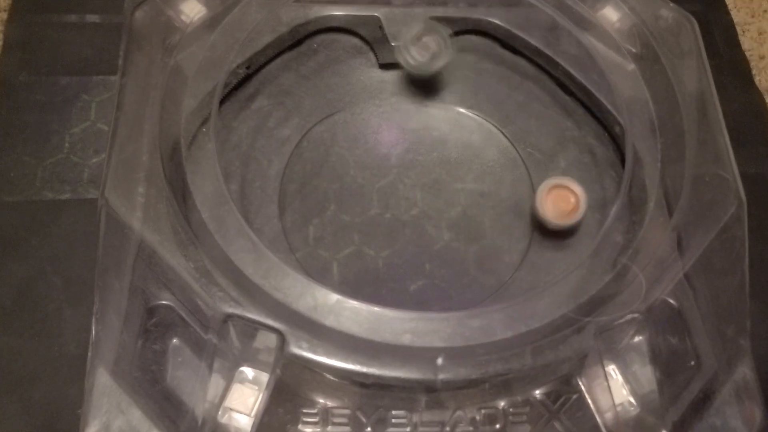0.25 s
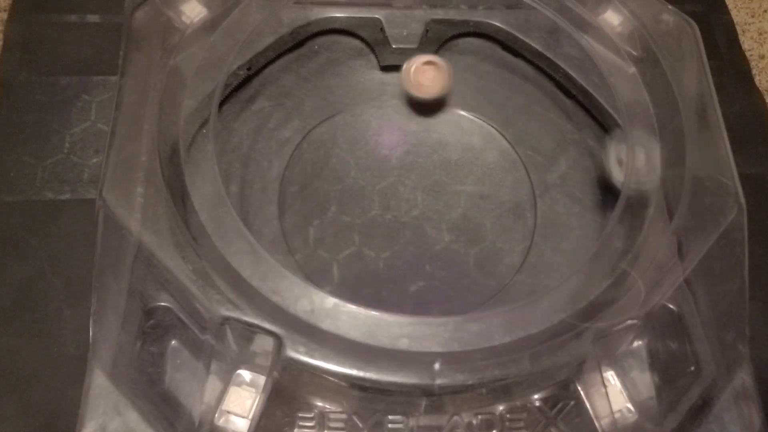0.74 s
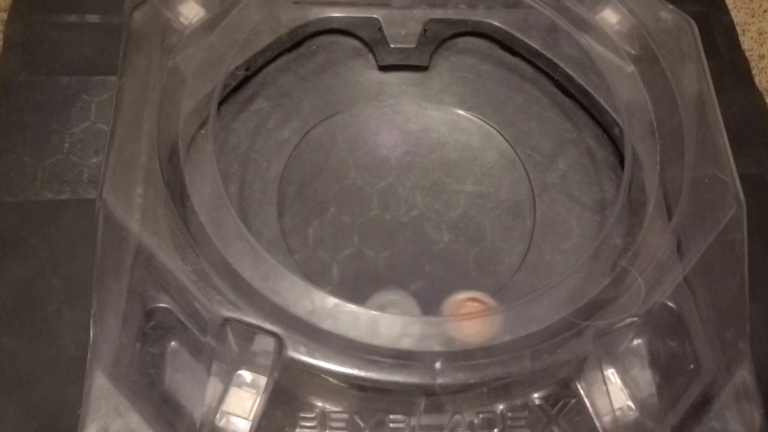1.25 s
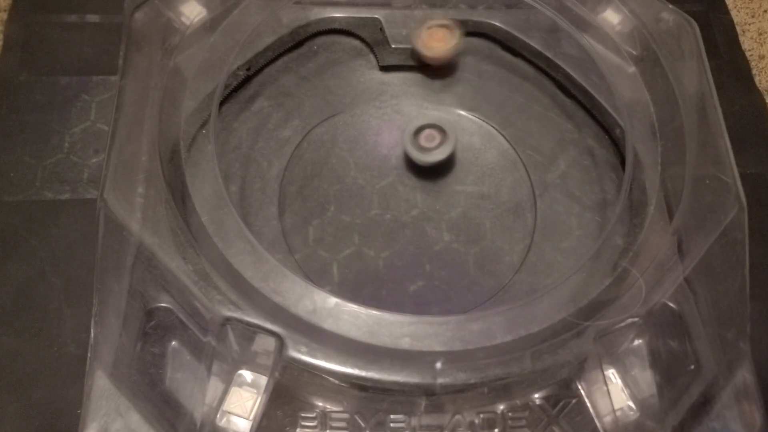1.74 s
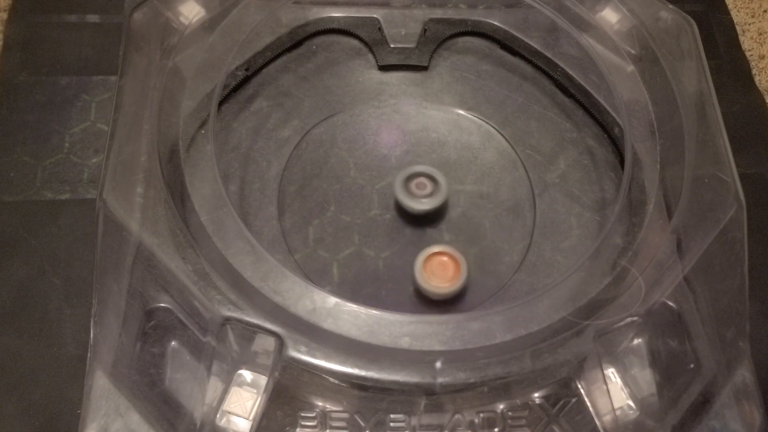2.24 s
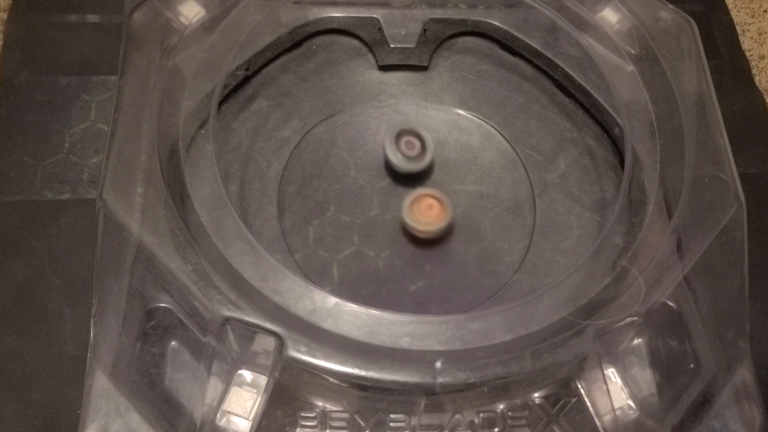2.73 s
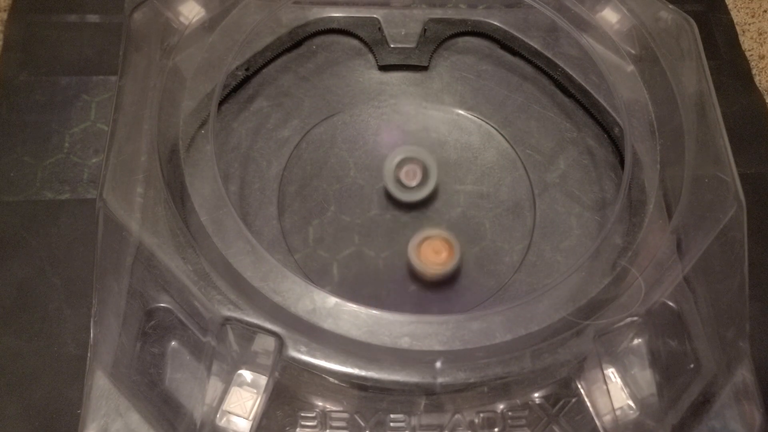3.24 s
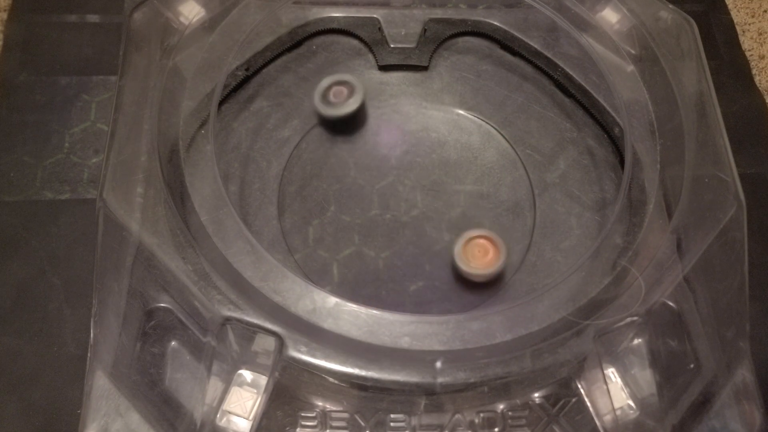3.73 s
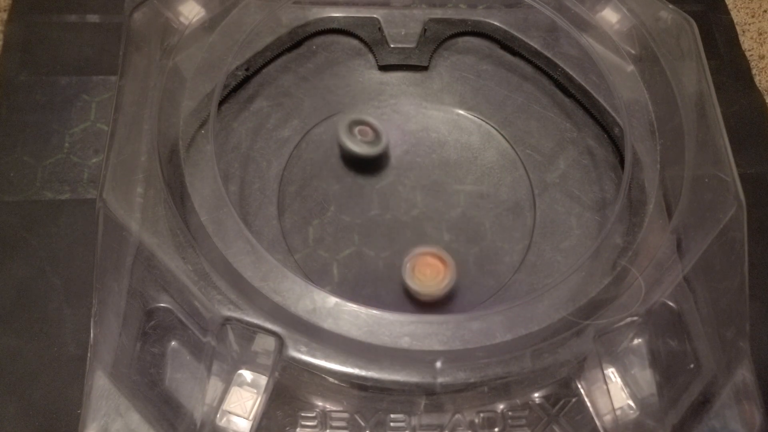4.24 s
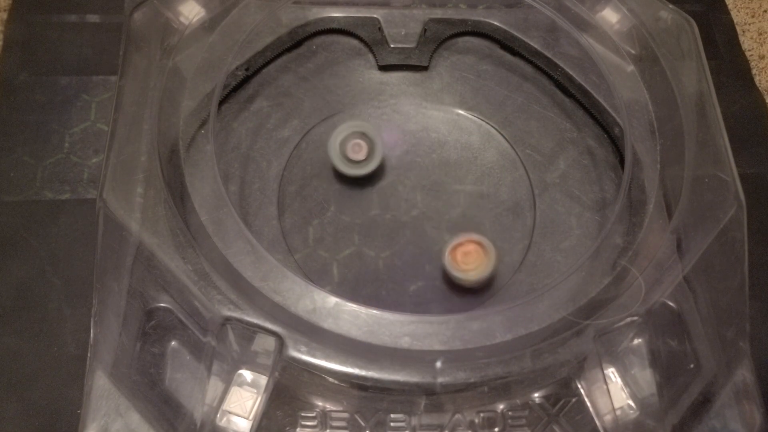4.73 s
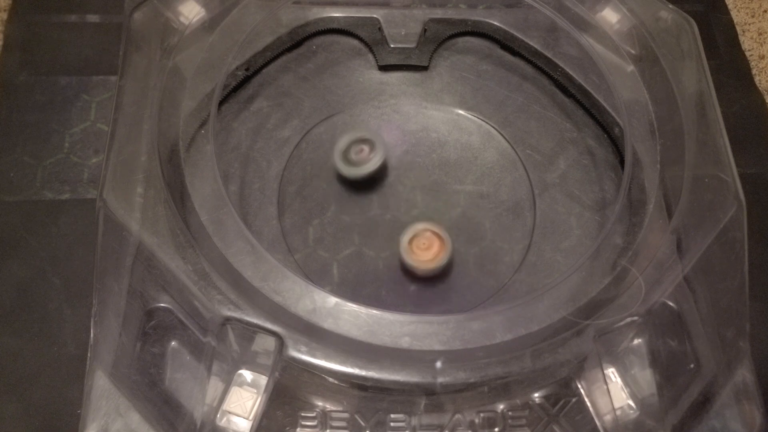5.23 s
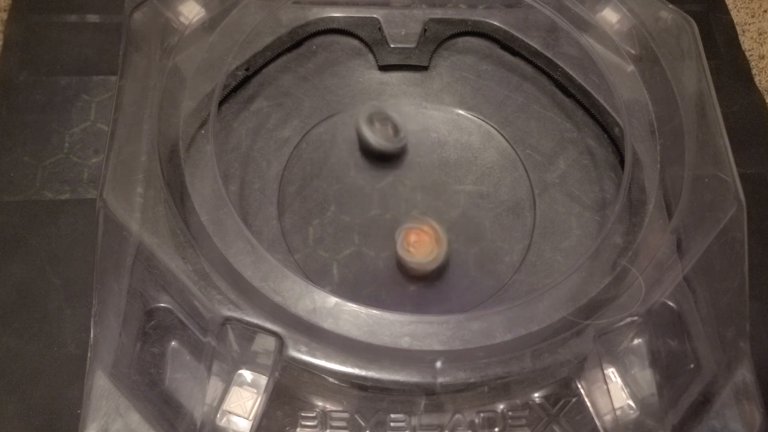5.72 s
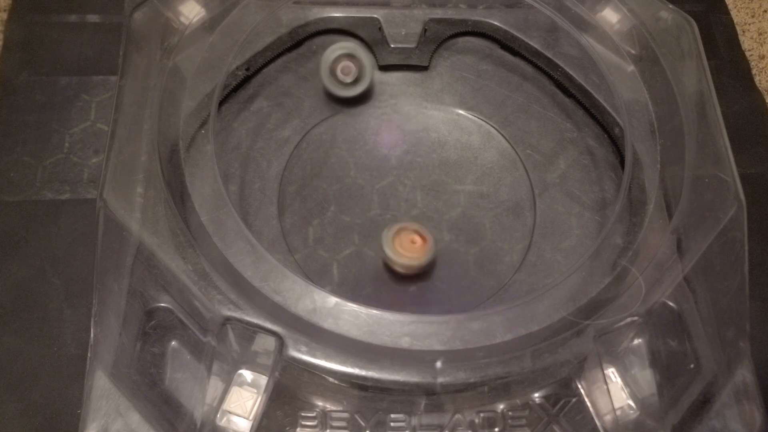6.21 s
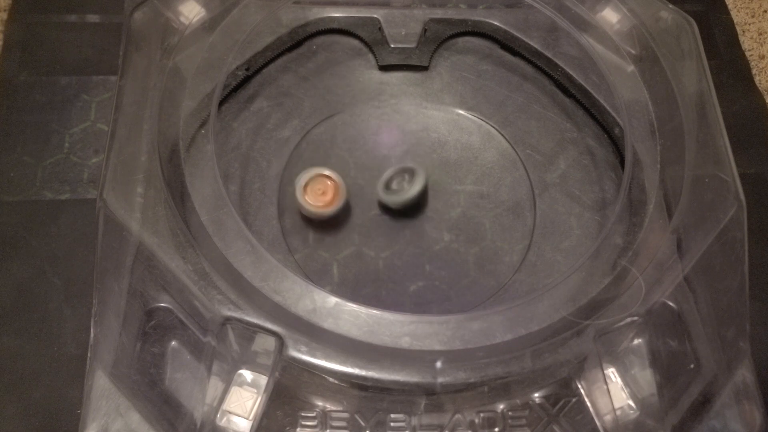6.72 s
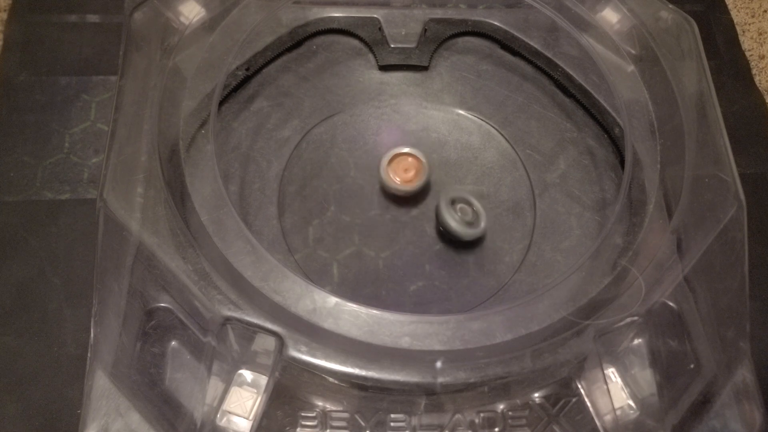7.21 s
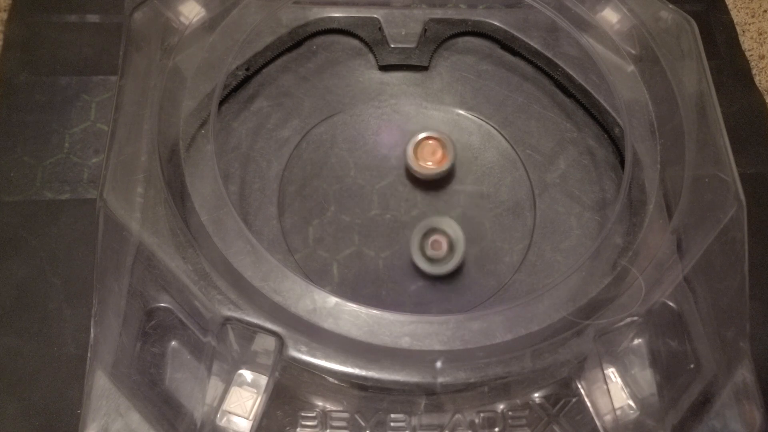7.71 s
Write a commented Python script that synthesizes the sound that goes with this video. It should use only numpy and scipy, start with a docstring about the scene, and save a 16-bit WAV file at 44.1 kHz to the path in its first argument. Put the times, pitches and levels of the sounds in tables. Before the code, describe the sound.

Close up, toy tops buzz along a toothed plastic rim, knock the walls, then circle and strike each other with bright metal clacks.

```python
"""Two spinning toy tops battle in a thin plastic bowl, close to a phone in a small room.
At first their tips scrape the floor while they race along the toothed rim rail and knock the wall.
Then they circle in the middle and their metal rings clash: noise bursts set decaying tones ringing.
After each clash a top drops back on the drum-like floor, a soft push on ringing tones.
Between clashes the wobbling tips throb, tick and hiss once a turn, as pushes and filtered noise."""
import sys
import numpy as np
from scipy import signal
from scipy.fft import rfft, irfft
from scipy.io import wavfile
from scipy.ndimage import uniform_filter1d

SR = 44100
rng = np.random.default_rng(int(sys.argv[2]) if len(sys.argv) > 2 else 0)


def digitize_waveform(pressure):
    """Quantize a signal to 16-bit integers and store it at the path in sys.argv[1].

    Rows of a 2-D input are taken as channels; values are limited to [-1, 1].
    """
    field = np.atleast_2d(pressure).T
    bounded = np.clip(field, -1, 1)
    quanta = np.round(bounded * 32767).astype(np.int16)
    wavfile.write(sys.argv[1], SR, quanta)


N = 351036
AGE = np.arange(SR // 4) / SR  # time since a blow, in seconds

# Levels in the tables are set against each other; each source is trimmed as a whole when mixed.
# Each new wobble of the tops: they climb the bowl to a turning point, then slide back;
# the scrape swells or fades on each leg:
# start t/s, floor panel f/Hz, unevenness/dB, second scrape half a turn later/0-1, edge click over scrape/dB,
# climb/s, scrape on leaving/dB, at the turning point/dB, on return/dB, throb over scrape/dB, roll over scrape/dB
WOBBLES = [(0.0, 193, 4, 0, -13, 0.27, -36, -48.5, -43, 0, -0.5),
           (0.96, 139.5, 6, 0.85, -9, 0.52, -45, -46, -60.5, 8.5, 2.5),
           (1.98, 113, 4.5, 0.3, -22, 0.14, -50.5, -52, -54, 7.5, 1.5),
           (2.46, 170.5, 4, 1, -21, 0.11, -46.5, -54, -45.5, 8.5, 0.5),
           (2.815, 172, 3, 0, -20, 0.12, -49, -51.5, -37.5, 3.5, -2.5),
           (3.33, 171, 7, 0, -18, 0.1, -41, -41.5, -42, 2, -9),
           (3.601, 167, 4, 0, -5, .3, -37, -52, -44, 5.5, 1.5),
           (4.155, 151, 2.5, 0.63, 4, 0.24, -44, -42.5, -40, 6, -3.5),
           (4.622, 130, 6.5, 0.17, 2, 0.19, -33.5, -50.5, -52, 0.5, -4),
           (5.210, 118, 2, .02, 3, .22, -40, -46.5, -41, 3, -3.5),
           (5.88, 225, 2, 0.64, -33, 0.16, -54.5, -43.5, -45, -12, -1),
           (6.540, 176, 4, 0, 4, 0.27, -43, -48, -46, -2, -3),
           (6.884, 126, 0.7, 0, 10.5, 0.31, -39.5, -51.5, -45.5, 1.5, -3.5),
           (7.639, 179, 2, 0.05, 6.5, 0.054, -50, -41.5, -44.5, 0, -1.5)]
# the leaning top slows down: t/s, spin/turns per s
SPIN_SPEED = [(.5, 54.6), (2.22, 50.6), (2.64, 48.1), (3.07, 47.3), (3.88, 44.1), (4.39, 41.6),
              (4.92, 39.4), (5.55, 37.8), (6.21, 32.8), (7.26, 30.5), (7.8, 29.3)]
# a top hits the plastic wall: t/s, level/dB, treble/dB, pitch of the wall there f/Hz, jolt of the floor/dB
WALL_KNOCKS = [(0.002, -13.5, -8, 726, -18.5), (0.064, -17, -14, 720, -21), (0.497, -10, -8, 800, -20),
               (0.53, -14, -5, 600, -21), (0.665, -11, -6.5, 670, -15.5), (0.76, -10.5, -3.5, 720, -36),
               (0.802, -13.5, -11.5, 563, -20), (0.919, -9.5, -0.5, 714, -28),
               (1.117, -14, -11.5, 2050, -13), (1.1735, -4.5, -15, 824, -37), (1.178, -10.5, -13, 366, -26),
               (1.35, -17, -6.5, 680, -26), (1.573, -21, -7.5, 654, -25.5),
               (1.7474, -13.5, -5.5, 630, -28.5), (4.3296, -23, -14.5, 2520, -39),
               (4.692, -18.5, -4.5, 1060, -16.5), (5.684, -32, 8, 3500, -31), (5.858, -9, -16, 574, -28),
               (6.526, -18, -12, 700, -24), (6.625, -26, -6, 1070, -29), (6.956, -32.5, -9, 580, -27)]
# metal ring hits metal ring, then the drop back: t/s, level/dB, top octave/dB, left minus right/dB,
# strongest ring f/Hz, plastic body/dB, hop/s, landing/dB, panel landed on f/Hz
RING_CLASHES = [(0.2377, -8, -27, -0.5, 5450, -33, 0.0054, -20, 190),
                (2.4214, -5.5, -12.5, 0, 5700, -49, 0.021, -15.5, 179),
                (2.7984, -5.5, -18, 0.5, 5570, -45, 0.026, -15, 200),
                (3.3114, -7, -13, 0, 3900, -23, 0.011, -5, 198),
                (3.5734, -5, 9, -1, 4800, -17, 0.0092, -64, 119),
                (3.5799, -8, -24, 0.5, 4360, -25, 0.11, -18, 208),
                (4.1456, -8, -6, -1, 2700, -38, 0.00095, -16.5, 185),
                (4.6101, -5.5, -9, 0.5, 4200, -19, 0.0052, -9.5, 176),
                (5.1858, -11.5, -28, -0.5, 5800, -39, 0.043, -18, 118),
                (5.7104, -6, -14, -0.5, 4800, -26, .024, -11, 190),
                (5.857, -9.5, -26, 1.5, 3647, -39, 0.0055, -8, 317),
                (6.5267, -12.5, -26, -2.5, 4100, -42, 0.0025, -7.5, 295),
                (6.8517, -5, -12, 2.5, 4340, -29, .012, -5, 192),
                (7.633, -6.5, -10, 0, 3500, -32, .004, -51, 173)]


def undb(db):
    """Turn decibels into gain."""
    return 10 ** (np.asarray(db) / 20)


def unit(x):
    """Scale to an average strength (rms) of 1."""
    return x / np.sqrt(np.mean(x ** 2))


def peak(x):
    """Scale so that the loudest 3 ms have rms 1."""
    power = np.mean(np.atleast_2d(x) ** 2, axis=0)
    return x / np.sqrt(uniform_filter1d(power, size=132).max())


def fade(t60):
    """Die away after a blow, by 60 dB in t60 seconds."""
    return np.exp(-np.log(1000) * AGE / t60)


def add(track, s, sound):
    """Mix a sound in at time s."""
    i = max(int(s * SR), 0)
    part = track[..., i:i + sound.shape[-1]]
    part += sound[..., :part.shape[-1]]


def through(x, response):
    """Send a sound through a response (convolve), keeping its length."""
    return signal.fftconvolve(np.atleast_2d(x), np.atleast_2d(response), axes=-1)[:, :x.shape[-1]]


def colour(x, points, size=2048):
    """Filter to a spectrum of (f/Hz, gain/dB) points, with no sound ahead of its cause."""
    hz, db = np.transpose(points)
    bins = np.maximum(np.arange(size // 2 + 1) * SR / size, 1)
    gain = undb(np.interp(np.log(bins), np.log(hz), db))
    # folding the cepstrum forward makes the filter minimum-phase
    cepstrum = irfft(np.log(gain))
    cepstrum[1:size // 2] *= 2
    cepstrum[size // 2 + 1:] = 0
    return through(x, irfft(np.exp(rfft(cepstrum))))


def resonate(x, hz, width):
    """Let one resonance, width Hz wide, sing along with a sound."""
    return signal.lfilter(*signal.iirpeak(hz, hz / width, fs=SR), x)


def ports(x, pan_db):
    """Place a sound between the microphone ports; the left one hears it 0 to 3 samples earlier."""
    lag = rng.integers(0, 4)
    right = np.pad(x[1], (lag, 0))[:x.shape[1]]
    return np.array([x[0], right]) * undb(np.array([[pan_db], [-pan_db]]) / 2)


def pair(n, apart):
    """Make left and right noises that share a common part."""
    return (rng.standard_normal(n) + apart * rng.standard_normal((2, n))) / np.hypot(1, apart)


def ring(modes, scatter_db, detune):
    """Sound the decaying tones of a struck body; every blow varies their levels and pitches."""
    chance = rng.standard_normal((len(modes), 2))
    total = 0
    for (hz, db, t60), (level_chance, pitch_chance) in zip(modes, chance):
        tone = np.sin(2 * np.pi * hz * (1 + detune * pitch_chance) * AGE)
        total = total + undb(db + scatter_db * level_chance) * fade(t60) * tone
    return total


def thump(hz, t60, push_s):
    """A soft push bends one panel and sets the whole floor ringing; slow bending does not radiate."""
    # tones of the floor: f/Hz, level/dB, 60 dB decay/s
    floor_modes = [(80, -18, 0.15), (104, -24.5, 0.57), (187.6, -8.5, 0.13), (237.6, -33.5, 0.2),
                   (349.7, -19.5, 0.14)]
    panel = fade(t60) * np.sin(2 * np.pi * hz * AGE)
    push = np.sin(np.pi * np.minimum(AGE / push_s, 1)) ** 2
    bend = through(panel + ring(floor_modes, scatter_db=-1, detune=0.017), push)
    return peak(signal.sosfilt(signal.butter(3, 75, "high", fs=SR, output="sos"), bend))


def room_air():
    """The quiet, bass-heavy noise of the room is filtered random noise."""
    # spectrum of the quiet room: f/Hz, gain/dB
    air_colour = [(25, 9), (55, -32), (120, 8.5), (300, -6), (1000, -13), (4000, -30), (16000, -51)]
    return unit(colour(pair(N, apart=0.09), air_colour)) * undb(-51)


def turns(start, end, hz, slowing):
    """Times of the turns of a top that loses a share of its speed every second."""
    age = np.arange(0, end - start, 1 / hz)
    return start + age + slowing * age * (age - (end - start)) / 2


def wobble_ends():
    """Each wobble lasts until the next one starts."""
    return [row[0] for row in WOBBLES[1:]] + [N / SR]


def travel(t):
    """Throb, scrape and roll in dB: they glide to the turning-point level on the climb, then to the return."""
    climb_bend, return_bend = 1.2, 3.2  # powers: the climb steepens, the return levels off
    downhill_db = 2.5  # extra throb of a top that presses into the hollow on its way back
    levels = np.zeros((3, N))
    for row, end in zip(WOBBLES, wobble_ends()):
        start, *_, climb_s, leave_db, turn_db, return_db, throb_db, roll_db = row
        climb = np.clip((t - start) / climb_s, 0, 1) ** climb_bend
        return_s = max(end - start - climb_s, 1 / SR)
        back = 1 - np.clip((end - t) / return_s, 0, 1) ** return_bend
        db = leave_db + (turn_db - leave_db) * climb + (return_db - turn_db) * back
        levels = np.where(t >= start, [db + throb_db + downhill_db * back, db, db + roll_db], levels)
    return uniform_filter1d(levels, size=SR // 50)


def other_top(t):
    """The other top spins faster and runs more smoothly: one equal rub per turn."""
    spin_hz = 1.27 * np.interp(t, *np.transpose(SPIN_SPEED))
    phase = np.cumsum(spin_hz) / SR % 1
    return np.exp(-phase / 0.19)


def rubs(friction, t):
    """A tip rubs one patch of the floor into singing: friction noise through a doubled resonance."""
    # singing patches: t/s, length/s, f/Hz, width/Hz, level/dB
    patches = [(2.988, 0.45, 1415, 200, -51), (2.975, .42, 2240, 1110, -56),
               (3.957, 0.88, 3500, 940, -50.5), (5.887, 0.46, 680, 375, -38.5),
               (5.975, 0.84, 387, 148, -40), (6.0, 0.66, 7905, 3496, -58), (7.318, 0.59, 1080, 79.6, -48)]
    out = np.zeros((2, N))
    for s, length, hz, width, db in patches:
        swell = np.sin(np.pi * np.clip((t - s) / length, 0, 1))
        song = resonate(resonate(friction, hz, width), hz, width)
        out += unit(song) * swell * undb(db - 5.0)
    return out


def tips():
    """Once a turn the leaning top presses the floor and its tip scrapes; similar bumps return each turn."""
    # spectra of scraping, rolling and the click of the tip's edge: f/Hz, gain/dB
    scrape_colour = [(710, -20), (1200, -0.5), (1370, -1.5), (1610, -9.5), (2020, -4.5), (2480, -10),
                     (3510, -3), (5300, -1.5), (5780, -7.5), (6440, -4), (11300, -17), (14800, -15),
                     (16000, -19)]
    roll_colour = [(24, -36), (40, -9), (65, -22.5), (102, -5.5), (157, -2.5), (174, -21), (222, -4),
                   (264, -4.5), (373, -13.5), (545, -21), (732, -19.5), (999, -28.5), (2500, -40),
                   (3250, -74), (5500, -120)]
    edge_colour = [(1500, -55), (3500, 6), (7000, 7), (15000, -3)]
    t = np.arange(N) / SR
    throb_db, scrape_db, roll_db = travel(t)
    throb, ticks, bumps, edge = np.zeros((1, N)), np.zeros(N), np.zeros(N), np.zeros(N)
    for row, end in zip(WOBBLES, wobble_ends()):
        start, panel_hz, uneven_db, second, edge_db, *_ = row
        spin_hz = np.interp((start + end) / 2, *np.transpose(SPIN_SPEED))
        press = thump(panel_hz, t60=0.074, push_s=0.0018)
        press = press / np.sqrt(np.sum(press ** 2) * spin_hz / SR)  # equal power at any spin
        track = rng.standard_normal(int(SR / spin_hz))
        for turn in turns(start, end, spin_hz, slowing=.02):
            force, grit, slip, later = rng.standard_normal(4)
            # the tip wanders on to fresh floor
            track = unit(track + 0.65 * rng.standard_normal(len(track)))
            add(throb, turn + .00006 * uneven_db * slip, press * undb(.55 * uneven_db * force))
            add(bumps, turn + .00004 * uneven_db * slip, track)
            add(ticks, turn + .0004 * grit, fade(.022) * undb((1 + uneven_db / 2) * grit))
            add(edge, turn, fade(0.0065) * undb(edge_db + uneven_db * grit))
            add(ticks, turn + .5 / spin_hz, second * fade(0.022) * undb(4.0 * later))
    # about 260 random grains per second
    grains = (rng.random(N) < 260 / SR) * rng.exponential(size=N)
    grains = uniform_filter1d(grains, size=40) * 40
    pressure = ticks + 0.41 * other_top(t) + 0.076 * grains + 0.17
    friction = (pair(N, apart=4.6) + 0.54 * bumps) * pressure
    # the scraping rings the plastic body of the top
    body = unit(resonate(friction, 3327, width=460))
    scrape = unit(unit(colour(friction, scrape_colour)) + undb(-5.5) * body)
    clicks = unit(colour(edge * pair(N, apart=0.96), edge_colour))
    scrape = scrape + undb(-14) * clicks
    rough_floor = bumps + 0.91 * pair(N, apart=0.057)
    roll = unit(colour(rough_floor * (1 + ticks), roll_colour))
    out = throb * undb(throb_db + 2.0) + scrape * undb(scrape_db) + roll * undb(roll_db + 4.5)
    return out + rubs(friction, t)


REBOUND_S = .006  # the spinning rim catches the wall a second time


def knock(db, treble_db, hz):
    """The rim chatters on the thin wall, which rings low and dies quickly."""
    # tones of the wall: f/Hz, level/dB, 60 dB decay/s
    wall_modes = [(271, -1, 0.074), (367.6, 6, 0.26), (535, -15, 0.12), (602, 7.5, 0.13), (662, -55, 0.06),
                  (796, -2.5, 0.14), (830, -4.5, 0.22), (1050, -44, 0.095), (1127, 10, 0.079),
                  (1408, 2.5, 0.13), (1770, 10, 0.071), (2040, 15, 0.031)]
    # spectrum of the slap: f/Hz, gain/dB
    slap_colour = [(100, -19.5), (320, 7), (450, -9), (750, -4), (1300, -7), (2000, -4.5), (3400, -6.5),
                   (5500, -6.5), (8000, -13.5), (16000, -21.5)]
    hard_thinning = 0.13  # dB of bass lost per dB of force: a harder knock is a briefer contact
    usual_db, usual_treble_db = np.mean(WALL_KNOCKS, axis=0)[1:3]
    contact = pair(len(AGE), apart=0.58) * np.minimum(AGE / 0.00081, 1)
    slap = peak(colour(contact * fade(0.057), slap_colour))
    wall = peak(through(contact * fade(0.014), ring(wall_modes, scatter_db=-2.5, detune=0.0018)))
    patch = peak(resonate(contact * fade(0.069), hz, width=0.1 * hz))
    bass_tilt = -hard_thinning * (db - usual_db)
    treble_tilt = 0.98 * (treble_db - usual_treble_db)
    tilt = [(200, bass_tilt), (330, 0), (1200, 0), (4500, treble_tilt)]
    hit = colour(slap + undb(-10.5) * wall + undb(-9) * patch, tilt)
    return ports(peak(hit), pan_db=-0.5) * undb(db - 4.5)


def knocks():
    """Each knock on the wall is a blow and a weaker rebound."""
    rebound_db = -7  # against the first blow
    out = np.zeros((2, N))
    for s, db, treble_db, hz, _ in WALL_KNOCKS:
        add(out, s, knock(db, treble_db, hz))
        add(out, s + REBOUND_S, knock(db + rebound_db, treble_db, hz))
    return out


def landing(db, hz):
    """A top thrown up by a blow drops back on the floor and pushes a panel into ringing."""
    return thump(hz, t60=0.024, push_s=0.0017) * undb(db - 6.0)


def landings():
    """Every clash ends in a hop, and every knock jolts the floor."""
    jolt_hz = 180  # the floor panel that a knock shakes
    out = np.zeros((2, N))
    for s, *_, hop_s, db, hz in RING_CLASHES:
        add(out, s + hop_s, landing(db, hz))
    for s, *_, db in WALL_KNOCKS:
        add(out, s + REBOUND_S, landing(db, jolt_hz))
    return out


def rail():
    """Gear teeth strike the rail in an uneven buzz that shakes the wall; the grip hardens and softens."""
    # the geared tip runs along the rail: t/s, length/s, first level/dB, last level/dB, teeth per s
    rail_rides = [(0.06, 0.1, -23, -28.5, 890), (0.176, 0.054, -30.5, -19.5, 680),
                  (0.505, 0.035, -30, -26, 590), (0.756, 0.029, -31, -22, 580),
                  (0.799, 0.074, -26, -22, 460), (0.888, .016, -23, -22, 700),
                  (0.907, .033, -16, -23.5, 850), (1.187, .075, -37, -46, 330)]
    # spectrum of the buzz: f/Hz, gain/dB
    buzz_colour = [(120, -28), (200, -3), (249, -14), (347, 0.5), (409, -3.5), (519, 1.5), (735, -0.5),
                   (916, -13), (3430, -7), (5630, -10), (8270, -21.5), (14600, -25), (16000, -30)]
    teeth = np.zeros((2, N))
    for s, length, first_db, last_db, hz in rail_rides:
        n = int(length * SR)
        rate = hz * (1 + .08 * np.repeat(rng.standard_normal(n), 64)[:n])
        tooth, phase = np.divmod(np.cumsum(rate) / SR, 1)
        tooth_gain = undb(0.77 * rng.standard_normal(n))
        grip = np.exp(-phase / 0.38) * tooth_gain[tooth.astype(int)]
        # the top bumps along: a new level in dB every 6 ms
        bumping = np.interp(np.arange(n) / SR, np.arange(50) * .006, 2.5 * rng.standard_normal(50))
        strikes = np.diff(grip, prepend=0) * 1.8 + grip * pair(n, apart=0.85)
        add(teeth, s, unit(strikes * undb(bumping)) * undb(np.linspace(first_db, last_db, n)))
    wall = undb(-8) * unit(resonate(teeth, 770, width=120))
    high_wall = undb(-14.5) * unit(resonate(teeth, 1910, width=320))
    buzz = unit(colour(teeth, buzz_colour)) + wall + high_wall
    return unit(buzz) * teeth.std() * undb(-2.0)


def clashes():
    """A hard crack, a grainy rattle of loose parts and a brief metal ring, strengthened at one pitch."""
    # tones of the metal ring: f/Hz, level/dB, 60 dB decay/s
    metal_modes = [(3180, -17, 0.38), (3430, -2, 0.19), (3940, 11, 0.11), (4660, -6, 0.18),
                   (5400, -4, 0.047), (5900, -19, 0.032), (7060, -25, 0.067), (7190, 13, 0.1),
                   (10500, -4, .05), (11200, -15, .05), (14300, 15, 0.031)]
    # spectrum of the crack: f/Hz, gain/dB
    crack_colour = [(200, 3.5), (600, -6), (1600, -11), (2100, -10.5), (2800, -5.5), (4200, -2.5),
                    (5600, 0.5), (7300, -2), (8200, -3.5), (12000, -3.5), (13500, -6.5), (15000, -11),
                    (16000, -4.5)]
    recatch_s, recatch_share = .0026, 0.52  # the next blade of the ring catches too
    out = np.zeros((2, N))
    usual_top_db = np.mean([row[2] - row[1] for row in RING_CLASHES])
    usual_body_db = np.mean([row[5] - row[1] for row in RING_CLASHES])
    for s, db, top_db, pan_db, hz, body_db, *_ in RING_CLASHES:
        contact = pair(len(AGE), apart=.55) * np.minimum(AGE / .0007, 1)
        grain_times = AGE[::90]
        grain_levels = rng.standard_normal(len(grain_times))
        rattle = undb(3 * np.interp(AGE, grain_times, grain_levels))
        next_blade = np.interp(AGE - recatch_s, AGE, fade(0.0058), left=0)
        blades = fade(0.0085) + recatch_share * next_blade
        crack = peak(colour(contact * (blades + 0.22 * rattle * fade(0.14)), crack_colour))
        metal = peak(np.array([ring(metal_modes, scatter_db=2, detune=.01) for _ in range(2)]))
        main = peak(resonate(contact * fade(0.019), hz, width=340))
        body_tilt = 0.28 * (body_db - db - usual_body_db)
        top_tilt = 0.5 * (top_db - db - usual_top_db)
        tilt = [(1500, body_tilt), (3500, 0), (6000, 0), (12000, top_tilt)]
        hit = peak(colour(crack + undb(-18) * metal + undb(-9.5) * main, tilt))
        add(out, s, ports(hit, pan_db) * undb(db - 4.0))
    return out


def skips():
    """An unsettled top skips: the rim taps and the tip thuds, each hop shorter and weaker."""
    # skips: t/s, first hop/s, tap of the rim/dB, thud of the tip/dB
    skip_starts = [(0.318, .054, -20.5, -14), (1.006, 0.044, -37, -21), (1.825, .07, -24, -17.5),
                   (3.382, 0.047, -25.5, -15.5), (5.276, .041, -33.5, -23.5)]
    hop_share, hop_loss_db = .7, 2  # each hop is this share of the last, and this much weaker
    treble_db, wall_hz, panel_hz = -9.5, 632, 172
    out = np.zeros((2, N))
    for s, hop_s, tap_db, thud_db in skip_starts:
        for k in range(3):
            tap = knock(tap_db - k * hop_loss_db, treble_db, wall_hz)
            thud = landing(thud_db - k * hop_loss_db, panel_hz)
            add(out, s, tap + thud)
            s = s + hop_s * hop_share ** k
    return out


def room(x, t60_low, t60_high, wet_db):
    """Dense reflections from the lid and near walls; the treble dies first and the bass hardly echoes."""
    noise = rng.standard_normal((2, len(AGE)))
    low = colour(noise, [(150, -13), (500, 4), (3500, 5.0), (9000, -20.0)]) * fade(t60_low)
    high = colour(noise[::-1], [(200, -60), (2500, -5.5), (7000, 4.5), (16000, -0.5)]) * fade(t60_high)
    tail = (low + high) * np.clip(AGE / 0.0045 - .5, 0, 1)
    return x + undb(wet_db) * through(x, unit(tail) / np.sqrt(len(AGE)))


def scene():
    """The bowl in its quiet room."""
    bowl = clashes() + knocks() + skips() + landings() + rail() + tips()
    return room(bowl, t60_low=0.21, t60_high=0.13, wet_db=-8.5) + room_air()


def record(dry):
    """Each microphone port has its own colour; the phone cuts the deep bass and the top, and clips peaks."""
    # the two ports: f/Hz, left minus right/dB
    port_colour = [(200, 0), (380, -1.5), (700, 3.5), (1300, 0), (4400, -2), (8100, 0), (15000, -3.5)]
    sides = []
    for x, side in zip(dry, (1, -1)):
        sides.append(colour(x, [(hz, side * db / 2) for hz, db in port_colour])[0])
    bass_cut = signal.butter(4, 45, "high", fs=SR, output="sos")
    top_cut = signal.ellip(10, .2, 80, 15900, fs=SR, output="sos")
    both = signal.sosfilt(bass_cut, np.array(sides))
    return signal.sosfilt(top_cut, np.clip(both, -1, 1))


dry = scene()
out = record(dry)
digitize_waveform(out)
```